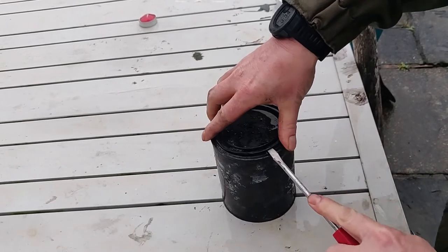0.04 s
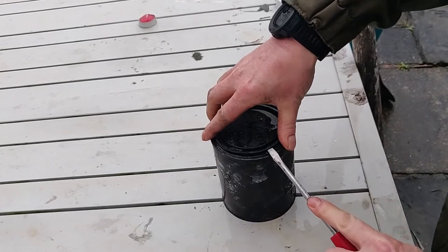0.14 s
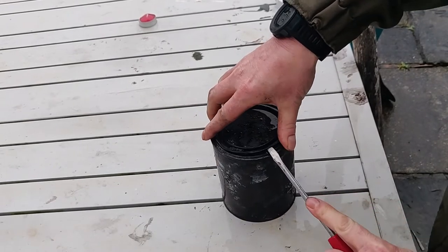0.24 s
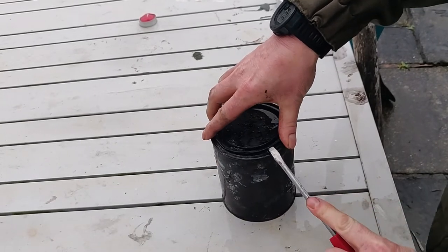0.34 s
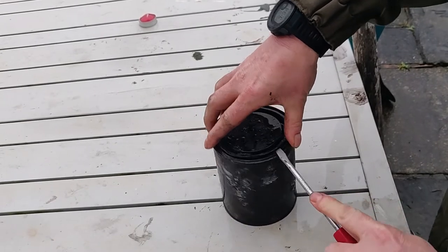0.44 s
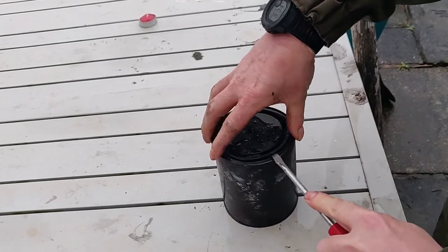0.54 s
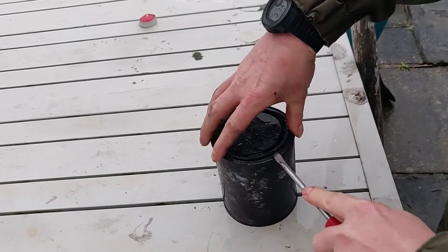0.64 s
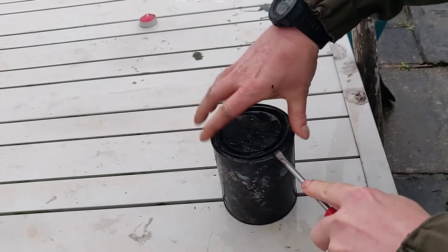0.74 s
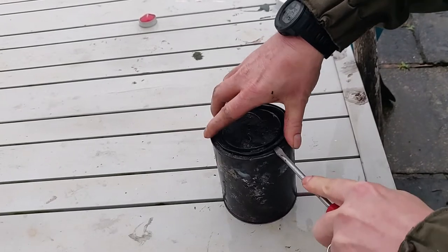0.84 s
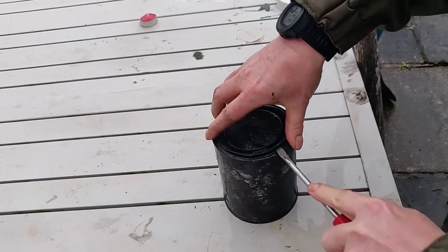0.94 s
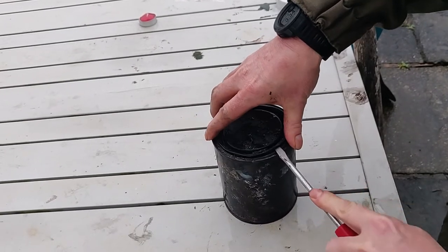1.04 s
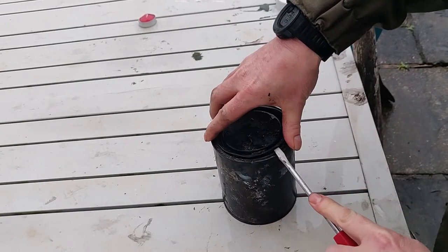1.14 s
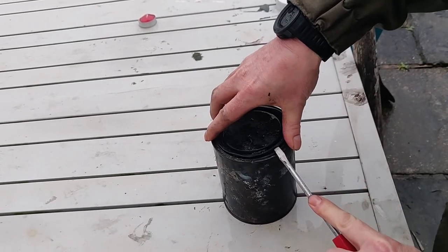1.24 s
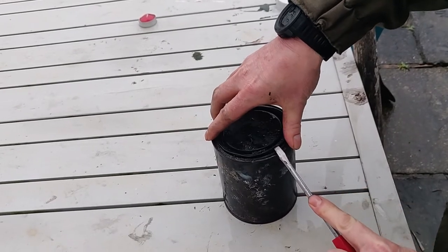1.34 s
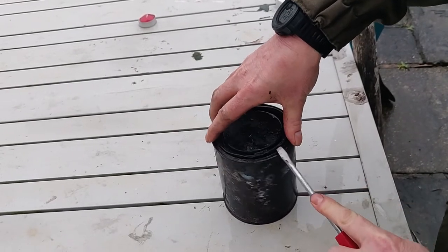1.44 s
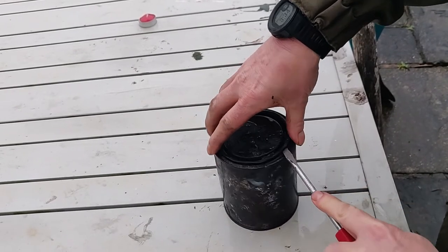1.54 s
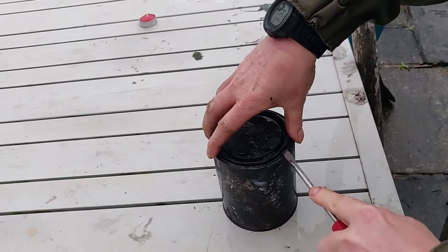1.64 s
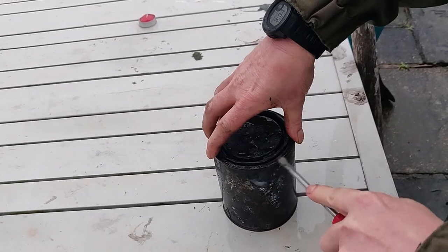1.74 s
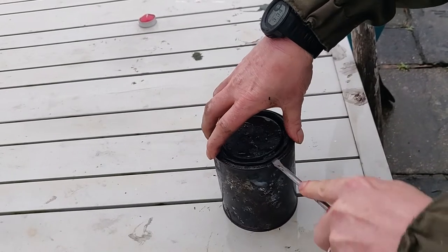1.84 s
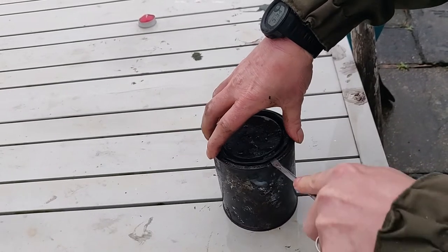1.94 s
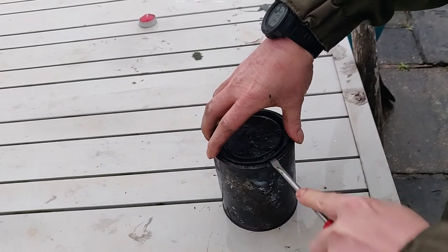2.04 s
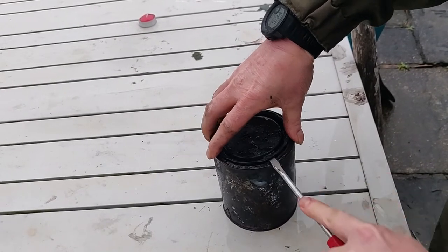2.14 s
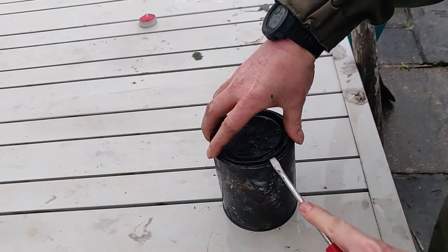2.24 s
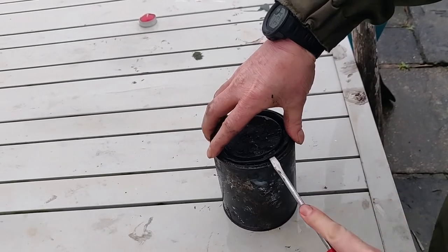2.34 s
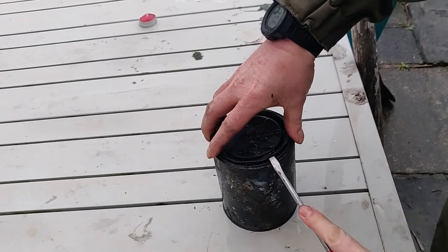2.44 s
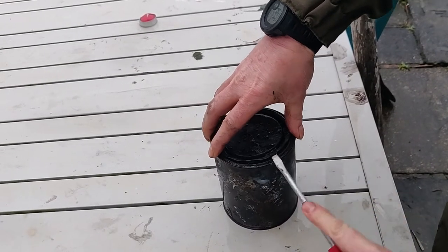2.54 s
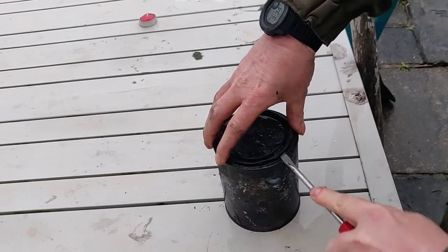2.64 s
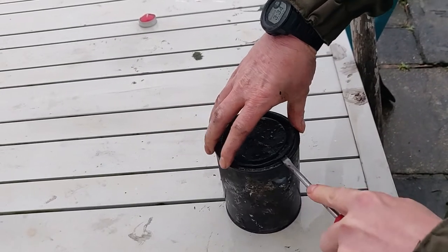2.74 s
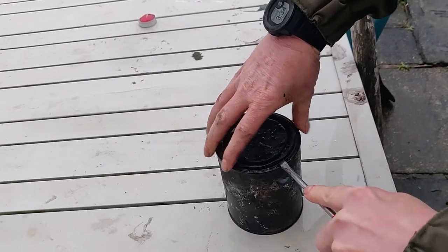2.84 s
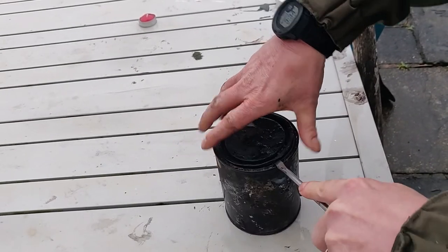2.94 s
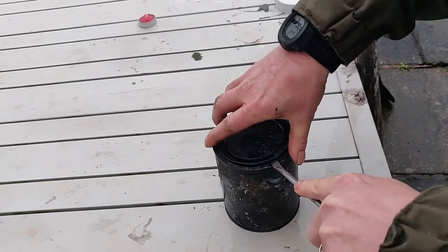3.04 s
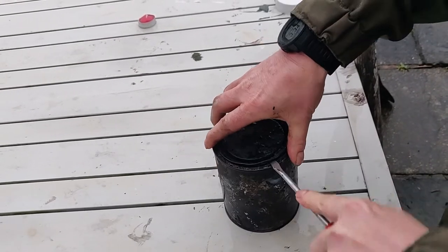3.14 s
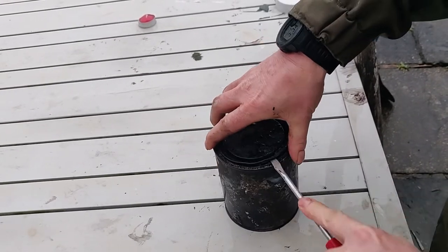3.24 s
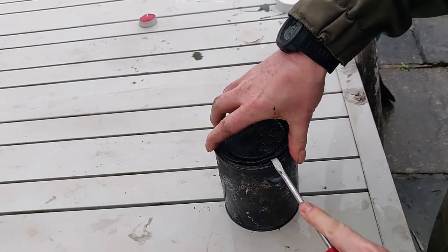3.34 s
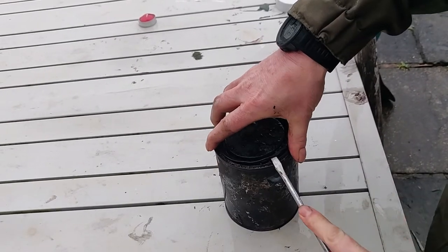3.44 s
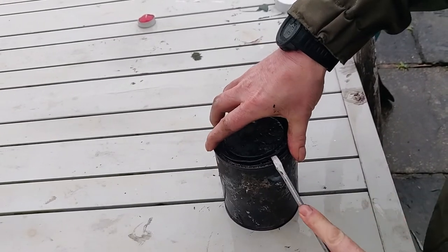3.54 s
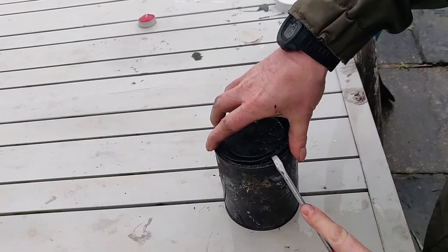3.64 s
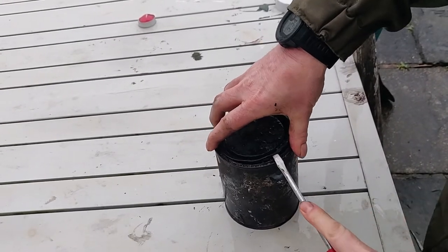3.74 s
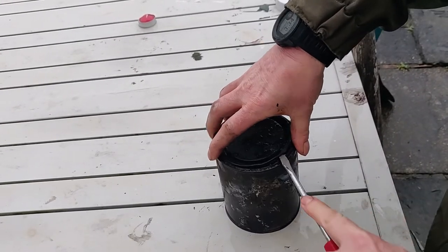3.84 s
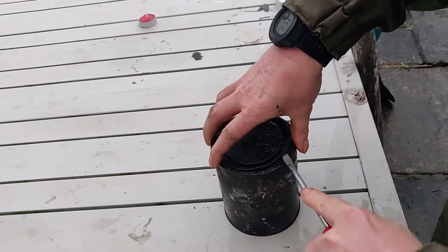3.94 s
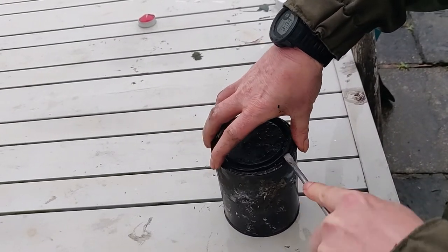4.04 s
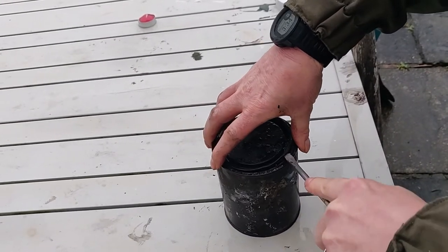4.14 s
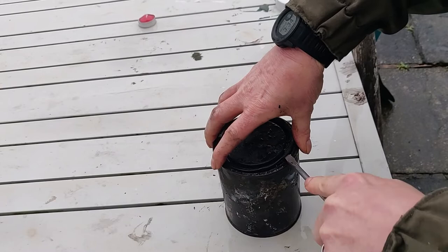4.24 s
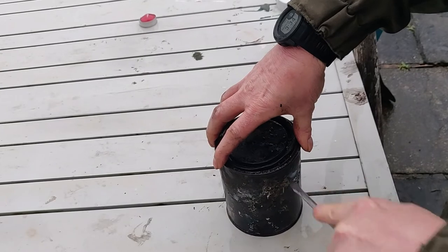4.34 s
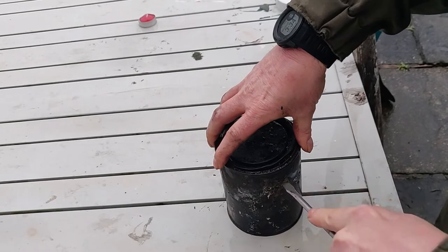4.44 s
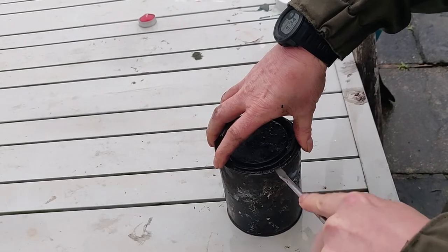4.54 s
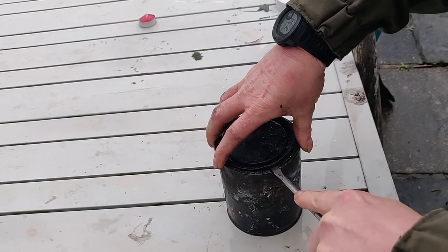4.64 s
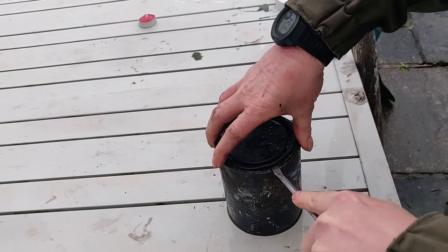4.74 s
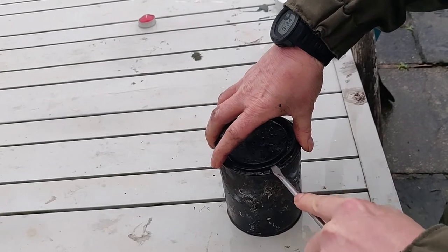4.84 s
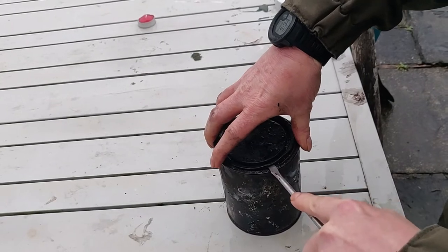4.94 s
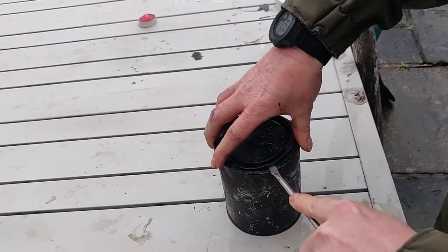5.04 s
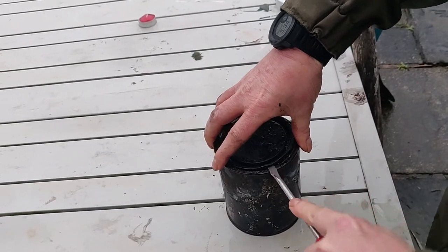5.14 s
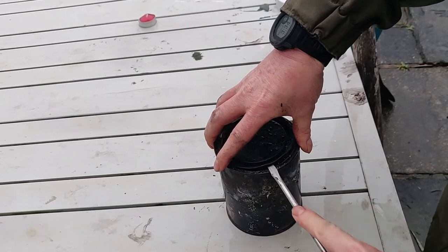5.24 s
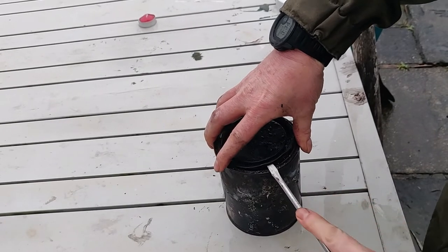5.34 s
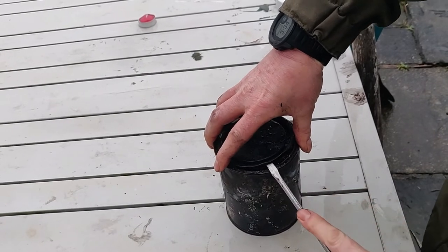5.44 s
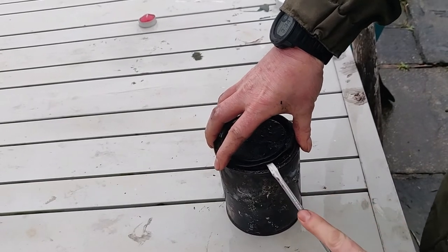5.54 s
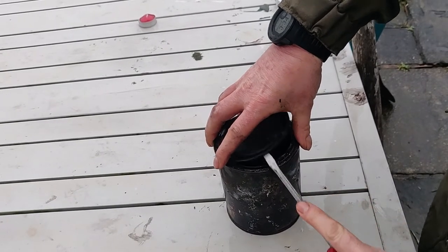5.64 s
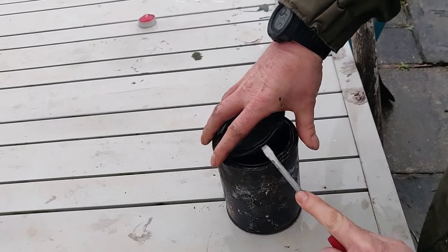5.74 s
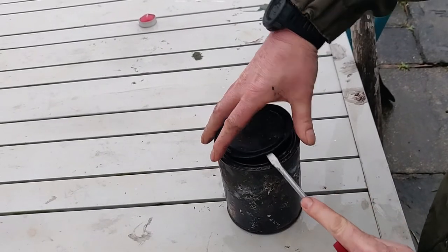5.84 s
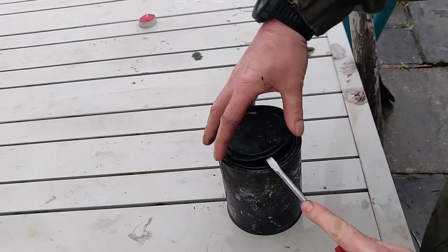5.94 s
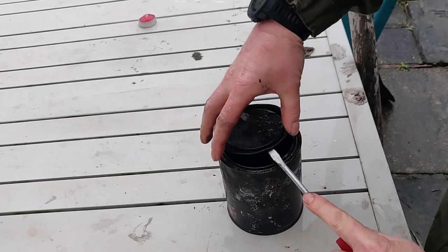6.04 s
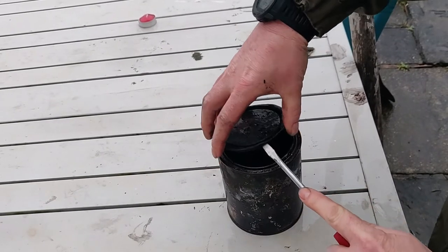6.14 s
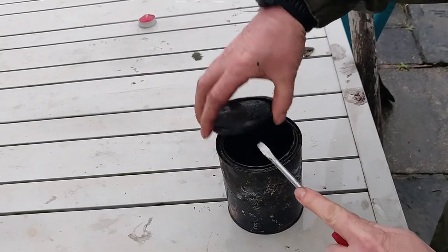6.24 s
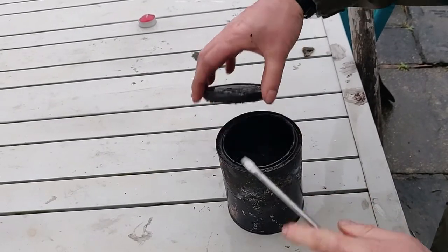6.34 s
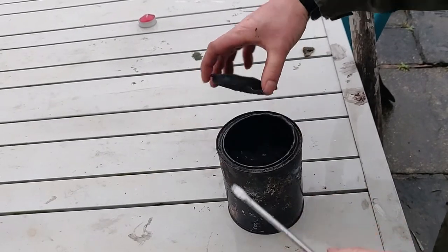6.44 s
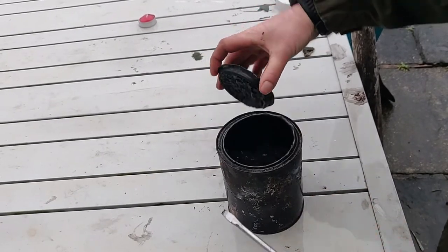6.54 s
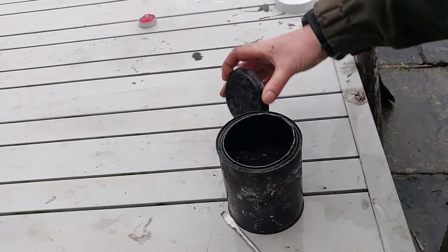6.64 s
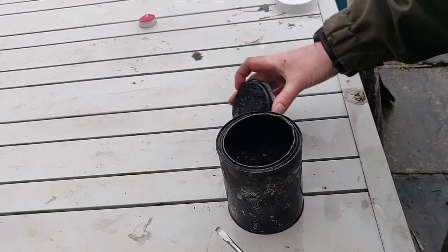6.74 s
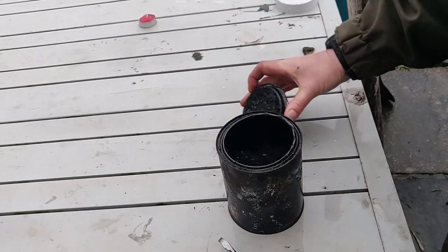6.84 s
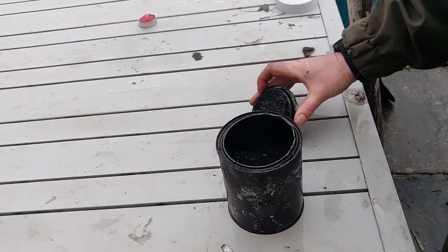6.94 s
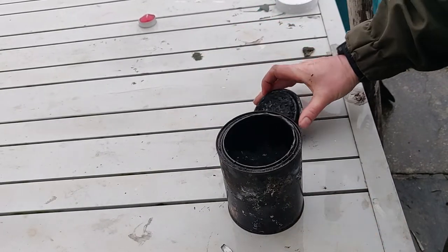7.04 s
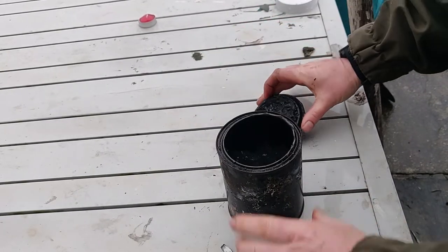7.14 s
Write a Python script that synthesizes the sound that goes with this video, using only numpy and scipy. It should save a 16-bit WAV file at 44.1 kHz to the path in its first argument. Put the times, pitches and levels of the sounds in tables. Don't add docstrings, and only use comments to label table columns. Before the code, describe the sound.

Wind thumps and flutters low on a phone's two microphones, with a faint far hum. Nearby, a metal blade scratches and pries at a hand-held small tin: irregular ticks, brief scrapes, squeaks and dull knocks, one hard bright crack standing out halfway. Late on the lid gives with short hollow bumps and thin rubbing, and the last clanks ring openly. Dry outdoor sound, no echo.

```python
import sys
import numpy as np
from scipy import signal
from scipy.fft import rfft, irfft
from scipy.io import wavfile
from scipy.ndimage import uniform_filter1d

SR = 44100
rng = np.random.default_rng(int(sys.argv[2]) if len(sys.argv) > 2 else 0)


def wav_out(sig):
    wavfile.write(sys.argv[1], SR, np.round(np.clip(np.atleast_2d(sig).T, -1, 1) * 32767).astype(np.int16))


def convert_level_to_amplitude(level_db):
    exponent = np.asarray(level_db, float) / 20
    return 10 ** exponent


N = 317936

# [f/Hz, level/dB per Hz]
HUM_COLOUR = [(59, 7), (100, -1.5), (235, -4), (323, 4), (391, -7.5), (790, -6.5), (2450, -20),
              (2960, -25.5), (15000, -36), (16300, -37)]
HUM_DB = -49
PASSING_DB, PASSING_S = 4, 0.17

# [t/s, level/dB]
GUSTS = [(0, -38), (.27, -46), (.42, -36), (.6, -52), (.72, -32.5), (.9, -44.5), (1.22, -32), (1.9, -41),
         (2.3, -28.5), (3.3, -31.5), (3.6, -43), (3.9, -29), (4.8, -35.5), (5.72, -29), (5.86, -39),
         (6.15, -36), (6.6, -51), (7.21, -59)]
# [f/Hz, level/dB per Hz]
BUFFET_COLOUR = [(8.8, -59), (15, 2), (157, -1), (280, -23), (363, -39), (400, -16.5), (520, -58),
                 (880, -120)]
# [t/s, left minus right level/dB]
WIND_BALANCE = [(0, -15.5), (1.5, 1), (5.8, -3.5)]
# [t/s, peak level/dB, f/Hz]
EDDIES_LEFT = [(1.338, -17.5, 121), (1.64, -16, 147), (1.806, -14, 93), (2.088, -14.5, 135.0),
               (2.515, -12.5, 107), (2.554, -11, 125.0), (2.719, -17.5, 131), (2.946, -11, 135),
               (2.978, -10, 123), (3.075, -13, 109), (3.105, -10.5, 139), (3.249, -18, 105.0),
               (3.332, -15, 163), (3.366, -14, 151), (3.959, -17, 155.0), (4.233, -15.5, 121),
               (4.402, -15, 117), (4.43, -11, 166), (4.543, -13, 141), (5.055, -16, 178),
               (5.162, -7.5, 174), (5.494, -16.5, 153)]
# [t/s, peak level/dB, f/Hz]
EDDIES_RIGHT = [(1.185, -11, 132), (2.112, -13, 106), (2.307, -9, 128), (2.329, -6.5, 162),
                (2.388, -9.5, 152), (2.41, -12.5, 149), (2.533, -14, 133), (2.569, -11, 141),
                (2.958, -9.5, 155), (3.228, -14, 122), (3.238, -15, 109), (3.361, -11.5, 109),
                (3.792, -13.5, 117), (3.941, -11, 170), (3.969, -14, 93), (4.03, -15, 123),
                (4.173, -18, 129), (4.586, -11.5, 125.0), (5.142, -12, 114), (5.181, -12.5, 114),
                (5.195, -12.5, 115), (5.419, -14.5, 148), (5.694, -5, 161)]

BLADE_HZ, BLADE_WIDTH_HZ, CHATTER_DB = 6420, 830, -70.5
PORT_LAG_S = 5 / SR

# [f/Hz, level/dB, t60/s]
BODY_MODES = [(323, -15, 0.25), (365, 1.5, 0.1), (453, -11, 0.3), (504.7, 1.5, 0.091), (590, -4.5, 0.071)]
# [f/Hz, level/dB, t60/s]
WALL_MODES = [(798, -8, 0.29), (891, -5.5, 0.16), (960.5, -3, 0.18), (1064, -5.5, 0.11),
              (1206, -0.5, 0.039), (1260, -1.5, 0.027), (1400, 3, 0.0091)]
# [f/Hz, level/dB, t60/s]
RIM_MODES = [(2060, 0, .06), (2490, -2, .05), (2900, 2, .08), (3400, 2, .07), (4080, 3, .07),
             (4650, 1, .05), (5630, 4, .06), (6300, 5, .04), (6700, 3, .04)]
# [f/Hz, level/dB, t60/s]
LEANED_MODES = [(1340, 3, .1), (1480, 3, .06), (1700, 0, .05), (2020, 3, .07), (2215, 5, .07),
                (2570, 5, .06), (2800, 4, .05), (2990, 3, .06)]
# [f/Hz, level/dB, t60/s]
LID_MODES = [(689, 6, .02), (1285, 1.5, .06), (1680, -11, .1), (2430, 1, .06), (3100, -3, .05),
             (3730, -2, .08), (4440, -8, .06), (5310, -4, .07), (5570, -2, .065), (6070, -7, .05),
             (6750, -6, .04), (7500, 3, .035), (9500, 7, .006), (13800, 9, .004)]

# [f/Hz, level/dB per Hz]
CRACK_COLOUR = [(1060, -2), (1800, -3), (3100, 1), (4080, -0.5), (4920, -3.5), (5540, 0.5), (5970, -3.5),
                (6470, 3.5), (8000, -12.5), (10400, -78), (17600, -120)]
# [f/Hz, level/dB per Hz]
TIP_COLOUR = [(4710, -6), (8000, -10), (12500, -9.5), (15100, 0), (16000, -14), (16700, -26)]
# [f/Hz, level/dB per Hz]
HISS_COLOUR = [(1060, 2), (1800, -5.5), (2700, -7.5), (4240, -7), (5240, -9.5), (6600, -8), (8090, -18.5),
               (10700, -20), (15100, -12.5), (16300, -31)]
# [f/Hz, level/dB per Hz]
RUMBLE_COLOUR = [(150, -6.5), (250, 1.5), (481, 3.5), (647, 0.5), (848, 0.5), (1550, -12.5), (1900, -15.5),
                 (2470, -17), (4180, -120)]

# [t/s, rim peak level/dB, tip treble level/dB]
TICKS = [(0.2184, -30.5, -32), (0.2346, -37, -31), (0.2648, -39.5, -33.5), (0.321, -37.5, -39),
         (1.0987, -33.5, -29), (1.1236, -34, -22), (1.315, -41, -35), (2.096, -51, -42),
         (2.2498, -26.5, -21), (3.36, -48, -28.5), (3.3897, -50, -36), (3.7225, -36, -30),
         (4.125, -31.5, -32), (4.835, -32, -43), (4.7501, -41, -37), (5.1013, -43, -38),
         (5.222, -34, -28.5), (5.5717, -37, -32), (5.5953, -22, -18.5), (5.6114, -28, -24),
         (5.658, -38, -32), (5.666, -30, -23), (5.688, -36, -27), (5.781, -40, -30), (6.066, -42, -32),
         (2.543, -42, -38), (2.8725, -42, -45), (2.972, -38, -36), (3.027, -34, -34), (4.02, -38, -36),
         (6.094, -26, -26.5), (6.8803, -50, -50)]
# [t/s, rim peak level/dB, body level/dB, wall level/dB]
FREE_KNOCKS = [(0.5395, -34, -26, -34), (0.5915, -31, -24, -27), (0.626, -40, -29, -31),
               (0.6751, -30.5, -25, -42), (1.4642, -34, -26, -32.5), (1.7795, -33, -24, -31),
               (2.7487, -26.5, -32, -27.5), (2.9866, -22.5, -17, -19), (3.9442, -24, -24, -39),
               (4.0487, -46, -16, -23.5), (4.6766, -38.5, -24, -36), (4.9124, -26, -17.5, -20.5),
               (5.437, -43, -32, -32), (5.6876, -35.5, -18, -34), (5.8479, -33, -28, -36),
               (6.2313, -37, -23, -15), (6.2632, -46, -10.5, -25), (6.9167, -20, -17, -15),
               (6.9315, -28, -20, -23)]
# [t/s, rim peak level/dB, body level/dB, wall level/dB]
HELD_SNAPS = [
    (0.9482, -43.5, -20.5, -37.5),
    (1.8909, -53, -26, -51),
    (3.0372, -29, -15, -21),
    (3.5463, -8.5, -12.5, -14.5),
    (4.3182, -19.5, -19.5, -17),
    (4.6286, -33, -30, -31),
    (4.8435, -22.5, -17, -18.5),
    (6.1725, -33.5, -16.5, -25.5),
]
# [t/s, rim peak level/dB, body level/dB, wall level/dB]
GRIPPED_BITES = [
    (2.138, -25.5, -51, -34),
    (3.5058, -6, -7, -10),
    (5.203, -34, -54, -36),
    (5.3081, -34, -41, -26),
    (5.3223, -25.5, -53, -25.5),
    (5.3378, -33, -51, -27),
    (5.4077, -19.5, -38, -24.5),
]
# [t/s, rim peak level/dB, body level/dB, wall level/dB]
DULL_KNOCKS = [
    (1.8522, -33, -19.5, -23),
    (4.3034, -19, -9, -14.5),
    (6.6805, -23, -16, -14),
]
# (t60/s, tip level over rim level/dB)
FREE, HELD, GRIPPED, DULL = (0.24, -9.5), (0.2, -6), (0.1, -8.5), (0.17, -34)

# [start t/s, length/s, hiss level/dB, rumble level/dB]
STROKES = [(0.633, 0.042, -45, -29.5), (1.469, 0.15, -41.5, -35), (1.81, 0.11, -85, -43),
           (2.563, 0.16, -40.5, -34), (2.967, 0.086, -41.5, -32), (3.27, 0.064, -49, -48.5),
           (3.734, 0.014, -45.5, -48), (3.801, 0.081, -38.5, -33), (3.916, 0.062, -45.5, -41.5),
           (4.031, 0.043, -40, -33), (4.137, 0.044, -54, -58), (4.254, 0.15, -48.5, -41),
           (4.436, 1, -91, -45.5), (5.387, 0.11, -50, -43), (5.905, 0.031, -47, -26),
           (6.254, 0.014, -68, -23)]
# [start t/s, length/s, hiss level/dB, rumble level/dB]
PUSHES = [
    (0.364, 0.057, -51, -42.5),
    (0.486, 0.11, -44, -35),
    (1.745, 0.045, -47.5, -43),
    (2.755, 0.07, -52.5, -46.5),
    (5.558, 0.15, -54.5, -47),
    (5.944, 0.236, -76, -55),
    (7.108, 0.11, -64, -52),
]
# [start t/s, length/s, hiss level/dB, rumble level/dB]
CREAKS = [
    (2.041, 0.053, -58, -50.5),
    (3.145, 0.055, -44.5, -40),
    (5.18, .006, -55, -52),
    (5.208, .02, -47, -48),
    (5.281, .008, -46, -52),
    (5.312, 0.038, -38.5, -41),
    (5.415, .035, -41, -42),
    (5.46, .04, -47, -45),
    (4.17, .1, -57, -46),
    (4.65, .1, -57, -47),
]
# [start t/s, length/s, hiss level/dB, rumble level/dB]
LID_RUBS = [
    (5.784, 0.01, -43, -58),
    (5.81, .02, -44, -50),
    (5.847, 0.02, -38, -41),
    (5.884, .006, -46, -52),
    (5.902, 0.03, -43, -41),
    (5.958, .018, -43, -50),
    (6.068, .008, -45, -40),
    (6.092, 0.045, -44, -36),
    (6.178, .02, -46, -47),
]
GRAB_DB_PER_S, LET_GO_DB_PER_S = 634, 324
SAG_DB, SWELL_DB = -5.5, 7.5

# [start t/s, length/s, level/dB, f/Hz]
SQUEAKS = [(.405, .04, -45, 950), (.5, .04, -44, 1300), (.545, .03, -52, 3500), (.675, .015, -52, 2600),
           (1.44, .012, -54, 6400), (1.47, .03, -49, 1800), (1.49, .04, -45, 750), (1.54, .03, -52, 4200),
           (1.765, .035, -44, 2900), (1.775, .045, -41, 1200), (2.56, .025, -50, 4300),
           (2.575, .07, -49, 3100), (2.62, .035, -52, 4150), (2.6, .05, -47, 1300), (2.77, .045, -51, 2900),
           (2.81, .02, -54, 5500), (2.81, .02, -56, 6800), (3.005, .02, -51, 4150), (3.05, .04, -52, 3200),
           (3.81, .055, -48, 6300), (3.945, .035, -44, 4000), (5.31, .04, -47, 6600),
           (1.775, .02, -47, 6500), (3.15, .05, -47, 1500), (1.87, .04, -45, 900), (2.9, .05, -50, 700)]
SQUEAK_SHARPNESS, SQUEAK_FADE_S = 9, 0.01
# [t/s, peak level/dB, f/Hz, t60/s]
PINGS = [(2.137, -28, 1400, 0.019), (3.506, -8, 6360, 0.029), (3.5465, -6.5, 1433, 0.033),
         (3.549, -3.5, 5380, 0.017), (4.63, -25.5, 1046, 0.05), (4.63, -33, 2400, .05),
         (4.305, -24, 1200, .07), (4.305, -28, 2200, .05), (1.853, -33, 3000, .04), (6.27, -33, 190, .3),
         (6.69, -33, 190, .3), (6.93, -34, 190, .3), (6.682, -21, 850, .15), (4.835, -30, 900, .05),
         (5.308, -31, 2800, .05), (5.324, -29, 2250, .07), (5.338, -30, 2650, .07), (5.338, -27, 950, .08),
         (5.278, -36, 2700, .04), (4.843, -14.5, 1400, 0.028), (5.205, -34.5, 1400, 0.084),
         (5.277, -32, 1350, 0.085), (5.308, -27, 1400, 0.097), (5.325, -25, 1340, 0.11),
         (5.406, -25, 1393, 0.098), (5.408, -27, 2870, 0.037), (5.894, -28, 1255, 0.12),
         (6.264, -44, 3100, 0.14), (6.917, -23, 3375, 0.08)]
# [t/s, peak level/dB, f/Hz, t60/s]
CLEAR_RINGS = [(3.506, -17, 350, .2), (3.506, -15, 780, .08), (4.845, -23, 2487, .1),
               (4.843, -19, 764, .06), (4.913, -22, 964, .09), (4.914, -30, 1830, .1),
               (4.914, -28, 441, .2), (6.681, -18, 1098, .07), (6.681, -24, 1560, .15),
               (6.681, -29, 2089, .14), (6.681, -28, 2762, .09), (6.681, -34, 4818, .16),
               (6.917, -22, 420, .25), (6.917, -23, 807, .17), (6.917, -23, 1319, .25),
               (6.917, -31, 1647, .25), (6.917, -30, 2083, .3), (6.917, -31, 2891, .15),
               (6.917, -26, 4048, .15)]
# [t/s, peak level/dB, f/Hz, length/s]
FLEXES = [
    (5.699, -17.5, 391, 0.012),
    (5.779, -34, 654, 0.02),
    (5.895, -9.5, 374, 0.02),
    (5.99, -33, 353, .04),
    (6.065, -29.5, 348, 0.037),
    (6.091, -24, 365, 0.036),
    (6.171, -27, 572, 0.018),
    (6.233, -10, 425, 0.019),
]


def shape(x, points):
    hz, db = np.transpose(points)
    f = np.maximum(np.fft.rfftfreq(x.shape[-1], 1 / SR), 1)
    gain = convert_level_to_amplitude(np.interp(np.log(f), np.log(hz), db, left=-90, right=-90))
    y = irfft(rfft(x) * gain, x.shape[-1])
    return y / np.sqrt(np.mean(y ** 2))


def curve(s, values, outside):
    return np.interp(np.arange(N) / SR, s, values, left=outside, right=outside)


def walk(rate, channels=2):
    k = int(SR / rate)
    levels = np.repeat(rng.standard_normal((channels, N // k + 1)), k, axis=1)
    return 1.913 * uniform_filter1d(levels, k, axis=1)[:, :N]


def add(out, x, s):
    i = max(int(s * SR), 0)
    out[:, i:i + x.shape[1]] += x[:, :N - i]


def ports(direct, others, spread):
    late = np.roll(direct, int(round(PORT_LAG_S * SR)))
    share = np.clip(spread, 0, 1)
    return np.sqrt(1 - share) * np.array([late, direct]) + np.sqrt(share) * others


def response(modes, damp, db=0):
    hz, top_db, t60 = np.transpose(modes)[:, :, None]
    t = np.arange(6000) / SR
    fade = convert_level_to_amplitude(top_db + db - 60 * t / (t60 * damp))
    return np.sum(fade * np.sin(2 * np.pi * hz * t), axis=0)


def ring(modes, rattle, damp, scatter_db=-1.0):
    detune = np.outer(rng.standard_normal(len(modes)), [0.02, 0, 0])
    struck = np.array(modes) * (1 + detune)
    tap = response(struck, damp, scatter_db * rng.standard_normal((len(modes), 1)))
    waves = signal.fftconvolve(rattle, tap[None], axes=1)[:, :rattle.shape[1]]
    return waves / np.max(np.abs(waves[0]))


def hum():
    noise = shape(rng.standard_normal((3, N)), HUM_COLOUR)
    low_pass = signal.butter(1, 450, fs=SR, output="sos")
    shared_bass = signal.sosfilt(low_pass, noise[0] - noise[1:])
    passing = PASSING_DB * np.exp(-np.arange(N) / SR / PASSING_S)
    return convert_level_to_amplitude(HUM_DB + passing) * (noise[1:] + shared_bass)


def wind():
    s, db = np.transpose(GUSTS)
    pan = curve(*np.transpose(WIND_BALANCE), None)
    buffet = shape(rng.standard_normal((2, N)), BUFFET_COLOUR) * convert_level_to_amplitude(2.66 * walk(14))
    out = buffet * convert_level_to_amplitude(-0.5 + curve(s, db, -60) + np.array([pan, -pan]) / 2)
    t = np.arange(-900, 900) / SR
    for port, eddies in enumerate((EDDIES_LEFT, EDDIES_RIGHT)):
        for s, db, hz in eddies:
            phase = 2.74 + 1.73 * rng.standard_normal()
            swing = np.cos(2 * np.pi * hz * t + phase) * np.exp(-(hz * t / 0.5) ** 2)
            add(out[port:port + 1], convert_level_to_amplitude(db) * swing[None], s + t[0])
    return out


def chatter():
    b, a = signal.iirpeak(BLADE_HZ, BLADE_HZ / BLADE_WIDTH_HZ, SR)
    lid_off = curve([6.2, 6.4], [0, -20], None)
    tremble = convert_level_to_amplitude(CHATTER_DB + 2.0 * walk(32, channels=1) + lid_off)
    noise = 4.1 * rng.standard_normal((2, N))
    return signal.lfilter(b, a, signal.lfilter(b, a, noise)) * tremble


def hits():
    out, t = np.zeros((2, N)), np.arange(10000) / SR
    crack_noise = shape(rng.standard_normal((3, N)), CRACK_COLOUR)
    tip_noise = shape(rng.standard_normal((3, N)), TIP_COLOUR)
    thud_noise = shape(rng.standard_normal((3, N)), RUMBLE_COLOUR)
    kinds = ((FREE_KNOCKS, FREE), (HELD_SNAPS, HELD), (GRIPPED_BITES, GRIPPED), (DULL_KNOCKS, DULL))
    blows = [(*row, t60, row[1] + tip_db) for rows, (t60, tip_db) in kinds for row in rows]
    ticks = [(s, rim_db, -90, -90, 0.07, tip_db) for s, rim_db, tip_db in TICKS]
    rise = 1 - np.exp(-(t / 0.002) ** 2)
    for s, rim_db, body_db, wall_db, t60, tip_db in blows + ticks:
        t60 = np.clip(t60, 0.03, 0.3)
        cut = rng.integers(N - len(t)) + np.arange(len(t))
        crack_fade = rise * (convert_level_to_amplitude(-60 * t / (0.2 * t60)) + convert_level_to_amplitude(-12 - 60 * t / (0.88 * t60)))
        rattle_fade = rise * (convert_level_to_amplitude(-60 * t / 0.013) + convert_level_to_amplitude(-19 - 60 * t / (1.18 * t60)))
        tip_fade = rise * (convert_level_to_amplitude(-60 * t / (0.11 * t60)) + convert_level_to_amplitude(-19.5 - 60 * t / (0.91 * t60)))
        rattle = rng.standard_normal((3, len(t))) * rattle_fade

        crack = 0.35 * crack_noise[:, cut] * crack_fade
        rim = crack + 0.14 * ring(RIM_MODES, rattle, 0.45, scatter_db=5.0)
        thud = 0.41 * thud_noise[:, cut] * rise * convert_level_to_amplitude(-60 * t / (0.42 * t60))
        wall = ring(WALL_MODES, rattle, 0.37) + thud
        body = ring(BODY_MODES, rattle, 0.5)
        tip = 0.49 * tip_noise[:, cut] * tip_fade

        blow = convert_level_to_amplitude(rim_db + np.array([[3.5], [6.5]])) * ports(rim[0], rim[1:], 0.77)
        blow += convert_level_to_amplitude(tip_db + np.array([[8.5], [7.5]])) * ports(tip[0], tip[1:], 0.97)
        blow += convert_level_to_amplitude(wall_db + 4.0) * ports(wall[0], wall[1:], 0.62)
        blow += convert_level_to_amplitude(body_db - 2.5) * ports(body[0], body[1:], 0.041)
        add(out, blow, s - 0.0009)
    return out


def pressure(start, length, change_db):
    t = np.arange(N) / SR - start
    grab = GRAB_DB_PER_S * np.minimum(t, 0)
    hold = change_db * np.clip(t / length, 0, 1)
    return grab + hold - LET_GO_DB_PER_S * np.maximum(t - length, 0)


def drags(strokes, modes, broad, tonal, damp):
    jumps = np.minimum(rng.exponential(size=N), 4.5) * (rng.random(N) < 0.3)
    slips = rng.standard_normal((3, N)) * convert_level_to_amplitude(2.3 * jumps)
    slips = slips * convert_level_to_amplitude(1.2 * walk(70, channels=1))
    part = response(modes, damp)
    part[0] += broad
    rung = signal.fftconvolve(slips, part[None], axes=1)[:, :N]
    place = np.arange(N) + 14.0 * uniform_filter1d(walk(12, channels=1)[0], size=2000)
    rung = np.array([np.interp(place, np.arange(N), r) for r in rung])
    hiss = shape(slips, HISS_COLOUR) + tonal * shape(rung, HISS_COLOUR)
    hiss = hiss / np.std(hiss)
    rumble = shape(rung, RUMBLE_COLOUR)
    upper = lower = 0
    for s, length, hiss_db, rumble_db, change_db in strokes:
        push = convert_level_to_amplitude(pressure(s, length, change_db))
        upper = upper + convert_level_to_amplitude(hiss_db) * push
        lower = lower + convert_level_to_amplitude(rumble_db) * push
    return upper * ports(hiss[0], hiss[1:], 1.0) + lower * ports(rumble[0], rumble[1:], 0.25)


def squeaks():
    out, t = np.zeros((2, N)), np.arange(5000) / SR
    lead = 0.03
    for s, length, db, hz in SQUEAKS:
        b, a = signal.iirpeak(hz, SQUEAK_SHARPNESS, SR)
        noise = rng.standard_normal((3, len(t)))
        tone = signal.lfilter(b, a, signal.lfilter(b, a, noise))
        beyond = np.maximum(np.abs(t - lead - length / 2) - length / 2, 0)
        tone = tone / np.std(tone) * convert_level_to_amplitude(db) * np.exp(-(beyond / SQUEAK_FADE_S) ** 2)
        add(out, ports(tone[0], tone[1:], 0.4), s - lead)
    return out


def pings():
    out, t = np.zeros((2, N)), np.arange(8000) / SR
    rows = [(*row, 1.0) for row in PINGS] + [(*row, 0.3) for row in CLEAR_RINGS]
    for s, db, hz, t60, rough in rows:
        spread = min(8.0 / (t60 * hz), 0.12)
        cluster = 1 + spread * np.array([0.155, -0.99, 0.84, 1.62])
        ratio = np.append(cluster, 2.1)[:, None, None]
        weight = np.append(1, rough * np.array([0.42, 0.56, 0.16, 0.15]))[:, None, None]
        phase = rng.random((5, 3, 1))
        tone = np.sum(weight * np.sin(2 * np.pi * (ratio * hz * t + phase)), axis=0)
        tone = tone * convert_level_to_amplitude(2.5 * rough * walk(500, channels=3)[:, :len(t)])
        tone = tone * (1 - np.exp(-t / 0.00055)) * convert_level_to_amplitude(db - 3.0 - 60 * t / t60)
        add(out, ports(tone[0], tone[1:], 0.33), s)
    return out


def flexes():
    out, t = np.zeros((2, N)), np.arange(8000) / SR
    for s, db, hz, length in FLEXES:
        held = convert_level_to_amplitude(1.3 * walk(150, channels=1)[0, :len(t)])
        held = held * np.clip(t / 0.0019, 0, 1) * np.clip((length - t) / 0.0062, 0, 1)
        left_over = convert_level_to_amplitude(-23.5 - 60 * t / 0.34) * walk(120, channels=1)[0, :len(t)]
        overtone = np.sin(2 * np.pi * 1.4 * hz * t + 6 * rng.random())
        tone = np.sin(2 * np.pi * hz * t) + 0.14 * overtone
        add(out, convert_level_to_amplitude(db) * np.tile(tone * (held + left_over), (2, 1)), s)
    return out


def scene():
    high_pass = signal.butter(2, 150, "high", fs=SR, output="sos")
    knocks = signal.sosfilt(high_pass, hits())
    strokes = [(*row, SAG_DB) for row in STROKES] + [(*row, SWELL_DB) for row in PUSHES]
    scrapes = drags(strokes, BODY_MODES + WALL_MODES + RIM_MODES, broad=95.0, tonal=0.34, damp=0.57)
    creak_strokes = [(*row, SAG_DB) for row in CREAKS]
    creaks = drags(creak_strokes, WALL_MODES[1:6] + LEANED_MODES, broad=3.0, tonal=2.0, damp=0.4)
    rub_strokes = [(*row, SAG_DB) for row in LID_RUBS]
    lid = drags(rub_strokes, LID_MODES, broad=1.0, tonal=2.2, damp=0.55)
    tin = chatter() + knocks + scrapes + squeaks() + pings() + creaks
    return hum() + wind() + tin + lid + flexes()


def band_limit(x):
    return signal.sosfilt(signal.butter(12, 16800, fs=SR, output="sos"), x)


def record(dry):
    rounded = 0.9 * np.tanh(dry / 0.9)
    top_cut = signal.ellip(5, 0.3, 34, 16100, fs=SR, output="sos")
    return band_limit(signal.sosfilt(top_cut, rounded))


dry = scene()
out = record(dry)
wav_out(out)
```